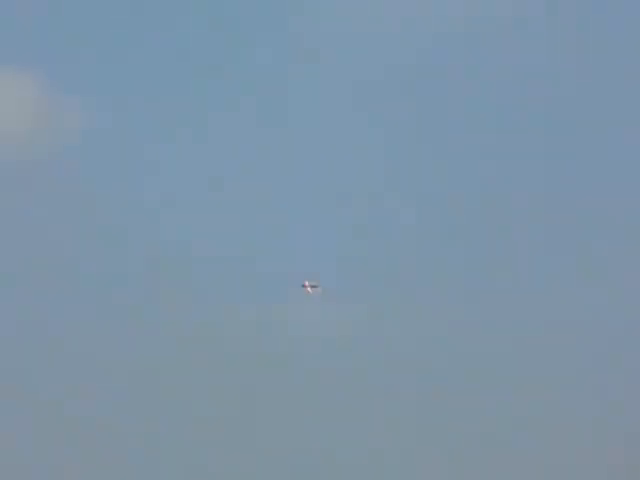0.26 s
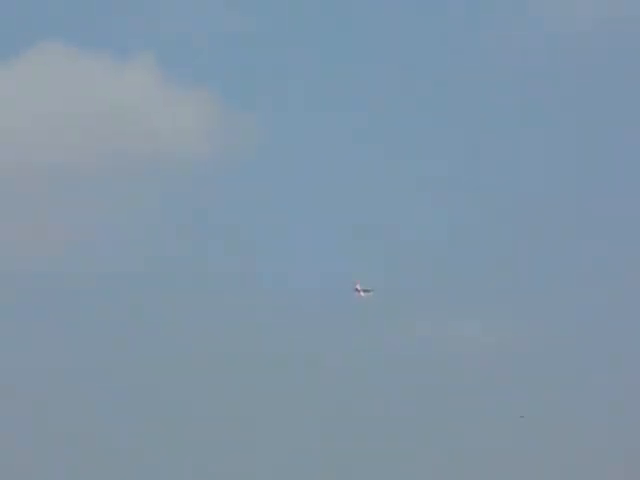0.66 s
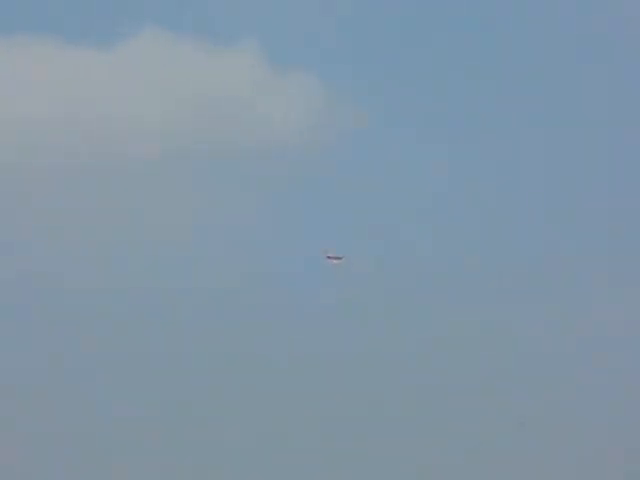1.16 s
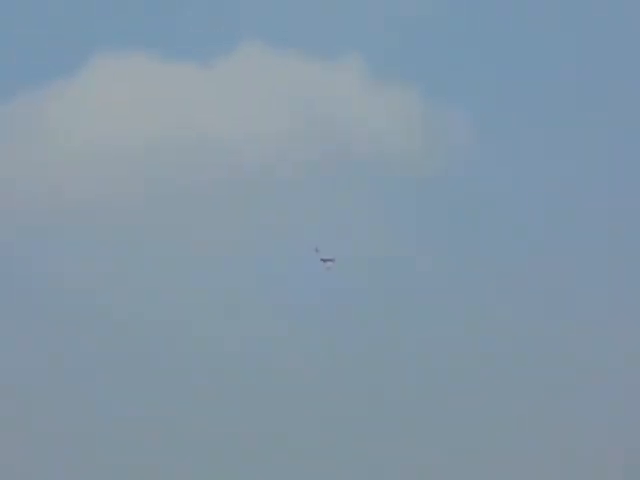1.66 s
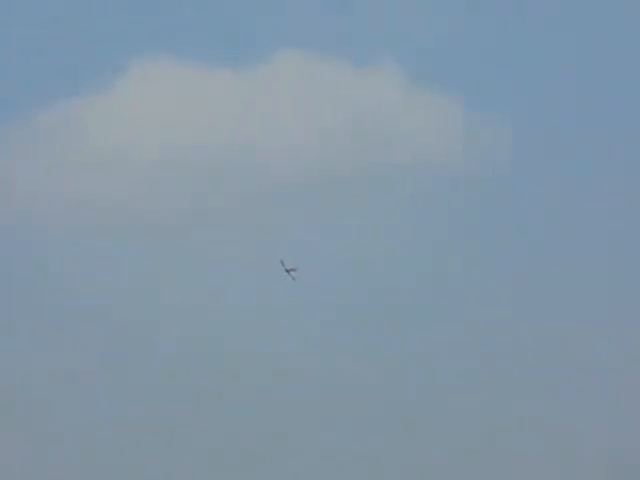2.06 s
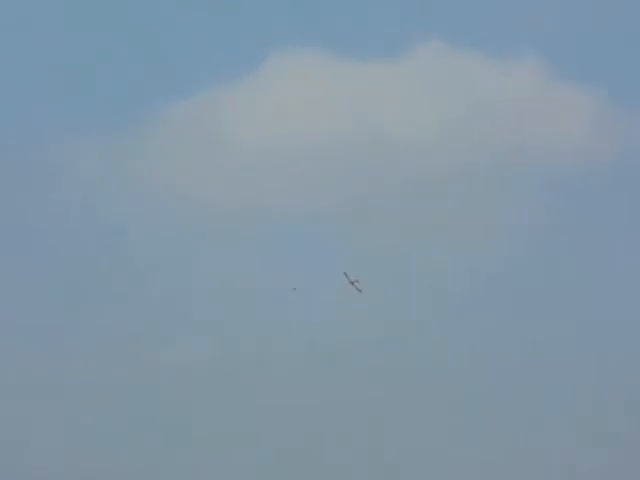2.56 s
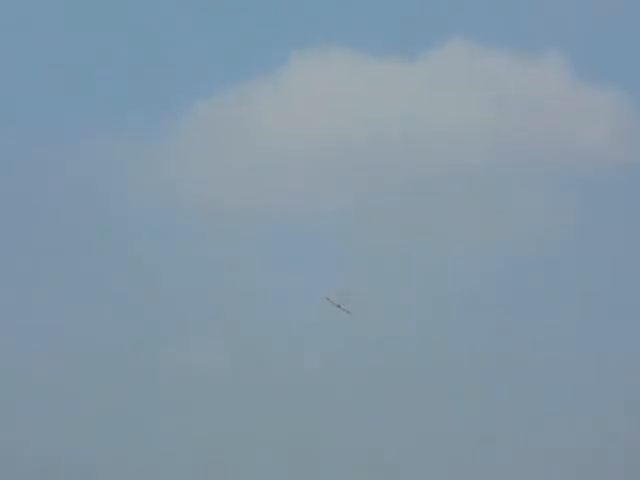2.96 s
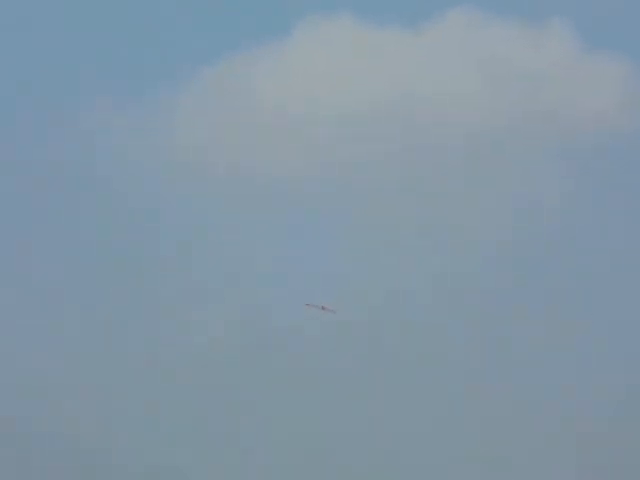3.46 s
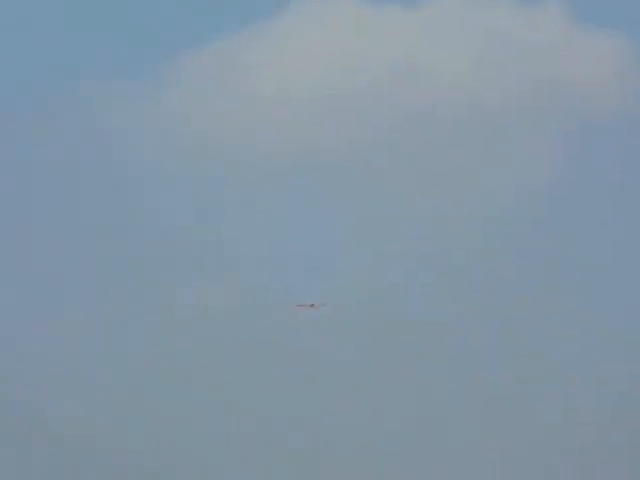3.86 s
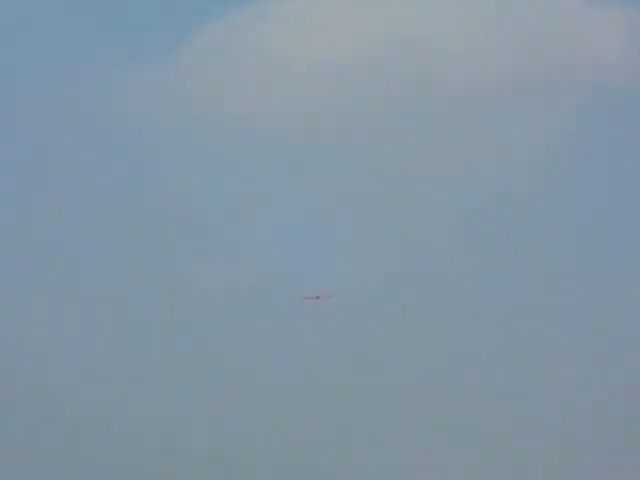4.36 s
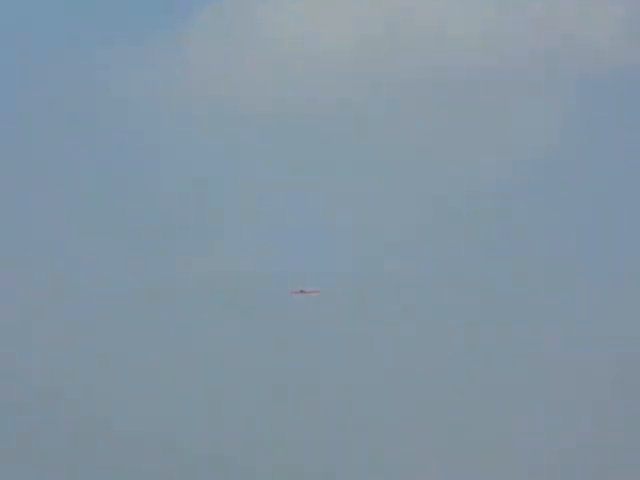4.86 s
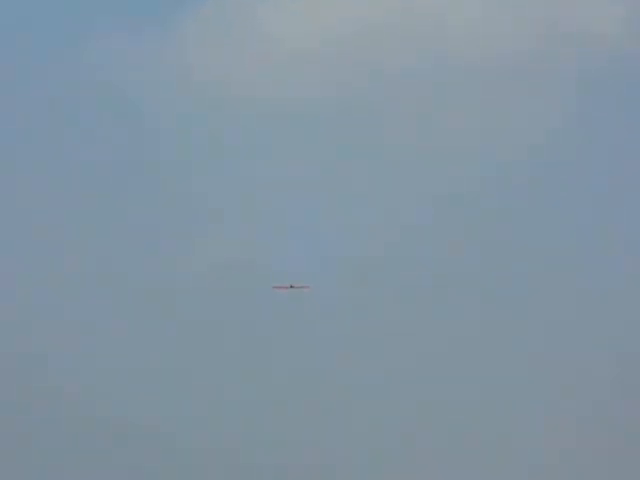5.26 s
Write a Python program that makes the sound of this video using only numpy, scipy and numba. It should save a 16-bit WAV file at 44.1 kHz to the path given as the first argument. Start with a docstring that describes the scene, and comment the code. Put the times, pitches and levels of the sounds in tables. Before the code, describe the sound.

In an open field, a small camera microphone picks up steady low wind rumble and a swelling hum. A tiny model airplane buzzes faintly far overhead, its nasal rasp coming and going. Small birds twitter throughout in quick falling chirps and fast trills, loudest around the middle. A hard plastic clack from the camera body comes at about half a second. The sound is coarse and lo-fi, with a glassy treble.

```python
"""An open field: a model airplane buzzes far overhead, its firing pulses and gas noise coloured by resonances.
Small birds twitter in falling chirps and quick trills, gliding sine notes with faint scattered echoes.
Filtered noise makes wind rumble on a small camera's microphone; a low hum swells and fades under it.
The camera's shell clacks once in ringing modes, and a limiter ducks the whole sound at loud peaks.
Coarse sampling gives the birds a glassy mirror image in the treble."""
import sys
import numpy as np
from scipy import signal
from scipy.fft import rfft, irfft, next_fast_len
from scipy.io import wavfile
from scipy.ndimage import uniform_filter1d
from numba import njit

SR = 44100
rng = np.random.default_rng(int(sys.argv[2]) if len(sys.argv) > 2 else 0)


def log_audio(samples):
    """Write samples as a 16-bit WAV file to the path given in sys.argv[1]."""
    # one column per channel
    frames = np.atleast_2d(samples).T
    # limit to full scale, then quantise
    limited = np.clip(frames, -1, 1)
    pcm = np.round(limited * 32767).astype(np.int16)
    wavfile.write(sys.argv[1], SR, pcm)


N = 242991
T = np.arange(N) / SR


def amp(db):
    """Decibels to gain."""
    return 10 ** (np.asarray(db) / 20)


def unit(x):
    """Scales to rms 1."""
    return x / np.sqrt(np.mean(x ** 2) + 1e-20)


def steadied(x):
    """Holds the rms near 1 over every tenth of a second, so that a level curve alone sets the slow swell."""
    return x / np.sqrt(abs(uniform_filter1d(x ** 2, size=4400)) + 1e-20)


def curves(rows):
    """Each column of a table, after its times, drawn as a curve over every sample."""
    s, *columns = np.transpose(rows)
    return [np.interp(T, s, c) for c in columns]


def add(mix, s, sound):
    """Mixes a sound in at time s."""
    part = mix[max(round(s * SR), 0):][:len(sound)]
    part += sound[:len(part)]


def noise(spectrum):
    """Noise of rms 1 with the given spectrum, dying away past its last point."""
    f, db = np.transpose(spectrum)
    size = next_fast_len(N)
    hz = np.fft.rfftfreq(size, 1 / SR) + 1  # the 1 keeps the logarithm finite
    gain = amp(np.interp(np.log(hz), np.log(f), db))
    gain = gain / (1 + (hz / f[-1] / 1.1) ** 20)
    white = rng.standard_normal(size)
    return unit(irfft(rfft(white) * gain, size)[:N])


def drift(rate):
    """Smooth random wandering of rms about 1, up to about rate times a second."""
    size, drift_rate = 4096, 500  # points, points per second
    hz = np.fft.rfftfreq(size, 1 / drift_rate)
    slow = irfft(rfft(rng.standard_normal(size)) / (1 + (hz / rate) ** 4))
    return unit(np.interp(T, np.arange(size) / drift_rate, slow))


@njit
def smooth(x, keep):
    """One-pole low-pass whose memory may change from sample to sample."""
    out, state = np.empty_like(x), 0j
    for i in range(len(x)):
        state = keep[i] * state + (1 - keep[i]) * x[i]
        out[i] = state
    return out


def ring(x, centre_hz, width_hz):
    """A resonance that can follow a moving centre and width: shift the centre to 0 Hz, smooth twice, shift back."""
    steady = np.ones(len(x))
    turn = np.exp(2j * np.pi * np.cumsum(centre_hz * steady) / SR)
    keep = np.exp(-np.pi * width_hz * steady / SR)
    return 2 * (turn * smooth(smooth(x / turn, keep), keep)).real


def engine(main_db=0.0, upper_db=-3, sizzle_db=-1, sizzle_low_db=-5, body_db=-53, twinkle_db=3.0, flutter_db=1.0):
    """Firing pulses and rasping puffs of gas pass the exhaust's resonances; moving air makes the harmonics twinkle."""
    # engine firing rate as heard on the ground, before jitter: [t/s, f/Hz]
    firing = [(.1, 113), (.3, 110), (.5, 104), (.8, 101.5), (1.0, 100.2), (1.35, 98.6), (1.62, 97.6),
              (2.12, 92.5), (2.35, 89.8), (3.08, 87.5), (3.42, 90), (3.74, 93.4), (4.02, 91.6),
              (4.17, 93.4), (4.4, 91), (4.65, 90.2), (5.11, 85.9), (5.3, 88)]
    # the exhaust turns towards and away from the ground; levels before trims:
    # [t/s, main resonance level/dB, its centre f/Hz, its width/Hz, upper resonance level/dB, sizzle level/dB]
    exhaust = [(.08, -67, 1530, 302, -72, -66), (.17, -49.5, 1560, 240, -61, -60.5),
               (.5, -51.5, 1580, 258, -56, -67), (.7, -58, 1710, 130, -62, -64),
               (.92, -54, 1700, 120, -63, -66), (1.3, -52, 1650, 172, -55.5, -58.5),
               (1.6, -52, 1630, 200, -59, -64), (1.78, -59, 1580, 403, -54, -61),
               (2.0, -54, 1750, 506, -48.5, -49.5), (2.25, -63, 1635, 500, -49.5, -55.5),
               (2.45, -64, 1650, 500, -53.5, -57), (2.9, -65, 1630, 504, -62.5, -70),
               (3.2, -53, 1590, 398, -54, -62), (3.5, -49.5, 1560, 450, -60, -54.5),
               (3.83, -52, 1560, 480, -64, -49), (4.07, -49, 1610, 490, -73, -60),
               (4.32, -47.5, 1710, 477, -66, -60), (4.7, -51, 1630, 377, -69, -62),
               (5.05, -51, 1690, 340, -65, -75), (5.4, -51, 1590, 300, -70, -74)]
    rasp_db = -9  # gas noise beside the pulses
    jitter = .0024  # unsteadiness of speed, as a share

    rate, = curves(firing)
    main, centre_hz, width_hz, upper, sizzle = curves(exhaust)
    phase = 2 * np.pi * np.cumsum(rate * (1 + jitter * drift(18.1))) / SR
    pulses = np.zeros(N)
    for order in range(5, 31):
        twinkle = amp(twinkle_db * drift(9))
        pulses += twinkle * np.cos(order * phase + .25 * drift(4))
    pulses = unit(pulses)
    hiss = noise([(500, 0.0032), (5000, 0.0054)])  # almost flat up to 5 kHz
    puffs = unit((1 + 0.71 * np.cos(phase)) * hiss)  # one puff per firing
    gas = pulses + amp(rasp_db) * puffs

    main_level = amp(main + main_db + flutter_db * drift(27))
    out = main_level * steadied(ring(gas, centre_hz, width_hz))
    out += amp(upper + upper_db) * steadied(ring(gas + puffs, 2440, width_hz=170))
    out += amp(sizzle + sizzle_low_db) * unit(ring(puffs, 2810, width_hz=390))
    out += amp(sizzle + sizzle_db) * unit(ring(puffs, 4200, width_hz=300))
    return out + amp(body_db) * unit(ring(pulses, 980, width_hz=570))


def whistle(hz, rough, late=1.32, quaver_db=0.5):
    """One bird note along a pitch curve, with slight flutter of pitch and level; a higher late delays its peak."""
    flutter = unit(uniform_filter1d(rng.standard_normal(4096), size=40))[:len(hz)]
    quaver = unit(uniform_filter1d(rng.standard_normal(4096), size=160))[:len(hz)]
    along = (np.arange(len(hz)) + .5) / len(hz)
    swell = np.sin(np.pi * along ** late) ** 0.95 * amp(quaver_db * quaver)
    phase = 2 * np.pi * np.cumsum(hz * (1 + rough * flutter)) / SR
    return np.sqrt(2) * swell * np.sin(phase)


def chirps(level_db=1, scatter_hz=20, scatter_db=1.06):
    """Near birds chirp in even runs that overlap; each note bends downwards, mostly ever faster."""
    # runs of chirps, pitches and levels before scatter, levels before trim:
    # [first note t/s, last note t/s, number of notes, note length/s, first top f/Hz, last top f/Hz,
    #  fall of each note/Hz, first level/dB, last level/dB, bend of the fall (1 = straight)]
    runs = [(.005, .195, 4, 0.049, 3820, 3850, 404, -62, -57.5, 1.7),
            (0.297, .445, 3, 0.045, 3830, 3800, 420, -63, -56, 1.7),
            (0.734, .805, 2, 0.038, 3850, 3870, 450, -52, -48, 1.5),
            (0.939, .94, 1, 0.043, 4060, 4090, 580, -52, -44, 1.7),
            (1.009, 1.348, 6, 0.047, 4140, 4130, 620, -47, -45, 2.3),
            (1.277, 1.492, 4, 0.051, 3920, 3880, 560, -49, -46.5, 1.44),
            (1.561, 1.642, 2, 0.04, 3890, 3960, 504, -49.5, -54, 1.6),
            (1.77, 1.765, 1, 0.0498, 3980, 3980, 620, -50, -50, 1.35),
            (2.231, 2.297, 3, .023, 3790, 3980, 480, -49, -47, 1.45),
            (2.32, 2.416, 4, 0.015, 4200, 4100, 420, -45, -48, 1.9),
            (2.322, 2.324, 1, 0.035, 3690, 3720, 480, -40, -38, 1.4),
            (2.364, 2.365, 1, 0.033, 3950, 3950, 600, -39, -38, 1.8),
            (2.433, 2.432, 1, 0.032, 4270, 4250, 836, -33, -34, .9),
            (2.392, 2.734, 6, 0.044, 3760, 3820, 514, -35.5, -33.5, 2.11),
            (2.48, 2.668, 4, 0.044, 4096, 4020, 684, -34, -42.5, 1.555),
            (2.795, 2.8, 1, 0.03, 3830, 3850, 310, -47, -44, 2.2),
            (2.844, 2.884, 2, 0.025, 3610, 3580, 308, -41, -38.5, 1.5),
            (3.003, 3.046, 2, 0.033, 3560, 3600, 318, -44, -39, 1.6),
            (3.176, 3.181, 1, 0.035, 3550, 3520, 230, -42.5, -42, 1.1),
            (4.343, 4.466, 3, .04, 4130, 4160, 750, -45.5, -38.5, 1.66),
            (4.52, 4.696, 4, 0.041, 4070, 3980, 606, -41.5, -43.5, 1.84),
            (4.798, 4.87, 3, 0.025, 3970, 3900, 380, -47.5, -44.5, 1.8),
            (4.891, 4.893, 1, 0.029, 4100, 4080, 420, -46, -47, 1.5),
            (4.949, 5.222, 5, 0.05, 4070, 4110, 650, -44, -44, 1.8),
            (4.732, 5.205, 6, 0.035, 3740, 3780, 380, -56, -57, 1.7),
            (5.27, 5.415, 3, 0.033, 3830, 3840, 497, -48, -47, 1.6),
            (5.478, 5.478, 1, 0.034, 3960, 3960, 555, -46.5, -46, 1.94)]
    arch_db = 1.5  # extra level in the middle of a run

    out = np.zeros(N)
    for first_s, last_s, notes, length, first_hz, last_hz, fall_hz, first_db, last_db, bend in runs:
        u = np.linspace(0, 1, min(round(length * SR), 4096))
        for along in np.linspace(0, 1, round(notes)):
            top_hz = rng.normal(first_hz + (last_hz - first_hz) * along, scatter_hz)
            db = rng.normal(first_db + (last_db - first_db) * along, scatter_db)
            db += arch_db * np.sin(np.pi * along)
            note = whistle(top_hz - fall_hz * u ** bend, rough=0.003)
            add(out, first_s + (last_s - first_s) * along, amp(db + level_db) * note)
    return out


def trills(level_db=1, tick_gap=.015, tick_length=.012, stray_s=.0008, scatter_db=0.2):
    """Each trill is a quick, slightly uneven group of very short, falling ticks."""
    # bouts of evenly repeated trills, pitch and levels before scatter, levels before trim:
    # [first trill t/s, last trill t/s, number of trills, ticks in each, middle f/Hz, fall of each tick/Hz,
    #  first level/dB, last level/dB]
    bouts = [(.1, .38, 3, 3, 5100, 250, -62, -59), (.795, .926, 2, 3, 4880, 250, -52, -49.5),
             (1.052, 1.318, 3, 4, 4930, 350, -49, -48), (.886, .886, 1, 2, 5020, 1100, -49, -48),
             (1.002, 1.442, 4, 4, 5000, 1250, -49.5, -45), (2.338, 2.338, 1, 3, 4960, 1200, -44.5, -43),
             (2.466, 2.905, 4, 4, 4950, 1200, -45, -43), (2.478, 3.024, 5, 4, 4950, 480, -56, -49.5),
             (3.97, 3.97, 1, 2, 5020, 1200, -45.5, -45), (4.084, 4.378, 3, 4, 4970, 1200, -44.5, -44),
             (4.16, 4.69, 5, 4, 4890, 250, -50.5, -51), (5.25, 5.25, 1, 2, 5030, 1150, -47, -46),
             (5.362, 5.362, 1, 4, 4970, 1150, -46.5, -46.5)]

    out = np.zeros(N)
    for first_s, last_s, groups, ticks, tick_hz, fall_hz, first_db, last_db in bouts:
        sweep = tick_hz + fall_hz * np.linspace(.5, -.5, round(tick_length * SR))
        for s, db in np.linspace((first_s, first_db), (last_s, last_db), round(groups)):
            for k in range(round(ticks)):
                tick = whistle(sweep * rng.normal(1, 0.008), rough=0.012, late=0.97)
                start_s = s + k * tick_gap + rng.normal(0, stray_s)
                add(out, start_s, amp(db + level_db + rng.normal(0, scatter_db)) * tick)
    return out


def click(level_db=-8.5, rattle_db=-18.0, rattle_t60=0.12, fizz_db=-10, scatter_db=1, lowest_hz=700):
    """Scrapes, two snaps and small rebounds ring the camera's plastic shell; loose parts chatter after each hit."""
    # hits on the shell: [t/s, relative level/dB, brightness as a gain on the modes above 2 kHz]
    hits = [(.5085, -25, .3), (0.5143, 0, 0.4), (0.5289, -4.5, 1.2), (0.5321, -13, .5), (.5395, -24, .5),
            (0.5435, -18, .8), (.5497, -22, .4), (.585, -30, 1), (0.5927, -26, .8)]
    # plastic sliding around the snaps: [start t/s, length/s, level/dB]
    scrapes = [(0.507, 0.0078, -33.5), (0.521, 0.0092, -29), (0.543, 0.0092, -36)]
    # modes of the shell: [f/Hz, relative level/dB before scatter, t60/s]
    shell = [(863, -27, 0.14), (950, -19, 0.012), (1010, -33, 0.081), (1057, -22, 0.074), (1080, -19, .07),
             (1145, -13, .06), (1260, 0.5, 0.024), (1312, -11.5, 0.05), (1460, -20, 0.0074),
             (1620, -21, 0.048), (1860, -14, 0.015), (2210, -2.5, 0.017), (2920, -34, 0.024),
             (4340, -15.5, 0.036)]
    contacts_per_s = 3700  # chatter of the loose parts

    out, t = np.zeros(N), np.arange(SR // 5) / SR
    for s, db, bright in hits:
        modes = np.zeros(len(t))
        for hz, mode_db, t60 in shell:
            decay = amp(rng.normal(mode_db, scatter_db) - 60 * t / t60)
            modes += decay * (bright if hz > 2000 else 1) * np.sin(2 * np.pi * hz * t)
        add(out, s, -amp(level_db + db) * modes)
        chatter = rng.standard_normal(len(t)) * (rng.random(len(t)) < contacts_per_s / SR)
        rattle = unit(ring(chatter, 1170, width_hz=470))
        rattle += amp(fizz_db) * unit(ring(chatter, 2500, width_hz=7200))
        add(out, s, amp(rattle_db + db - 60 * t / rattle_t60) * rattle)
    for s, length, db in scrapes:
        stroke = np.sin(np.pi * np.minimum(t / length, 1))
        rub = unit(ring(rng.standard_normal(len(t)), 4500, width_hz=310))
        add(out, s, amp(db) * stroke * rub)
    highpass = signal.butter(3, lowest_hz, "high", fs=SR, output="sos")
    return signal.sosfilt(highpass, out)  # so small a shell gives no bass


def wind(rumble_db=1.05, flutter_db=-1.96, rush_db=0.0, hiss_db=-9, deep_db=-1.5, rumble_lumps_db=1, flutter_lumps_db=1):
    """Eddies rumble at the microphone and flutter round the housing, over a rush of air, a deep undertow and hiss."""
    # strength of the wind, before trims:
    # [t/s, rumble level/dB, flutter over the housing level/dB, rush of air level/dB, deep undertow level/dB]
    gusts = [(0, -44.5, -54, -53, -39), (.22, -37, -41.5, -45.5, -45.5), (.48, -30, -41, -42.5, -43),
             (.72, -30.5, -34, -43.5, -42), (1.05, -30.5, -34, -43.5, -41.5), (1.5, -29, -34.5, -40.5, -43),
             (2.15, -32.5, -35, -42, -37.5), (2.6, -32, -45.5, -42.5, -36.5),
             (3.35, -33.5, -45.5, -42, -38), (3.8, -29, -42.5, -41.5, -38), (4.1, -31, -41, -41.5, -36.5),
             (4.38, -29.5, -36, -41, -39), (4.7, -32, -40.5, -42.5, -43), (5.2, -34.5, -39, -41.5, -39),
             (5.51, -37, -40.5, -41.5, -34)]
    # spectra of eddies at the microphone, flutter, rush, hiss and undertow: each [f/Hz, relative level/dB per Hz]
    rumble_spectrum = [(50, -30), (85, -13.5), (105, -11), (135, -1), (152, -4.5), (168, -2), (184, -1),
                       (215, -3.5), (260, -12), (320, -24), (600, -50.5)]
    flutter_spectrum = [(250, -28), (320, -6), (365, 2), (420, 2), (490, -1.5), (560, -23.5), (640, -10),
                        (800, -45)]
    rush_spectrum = [(200, -1.5), (600, 3), (800, -2), (1100, -3.5), (1400, -6), (2000, -10.5), (3000, -24),
                     (5400, -38.5)]
    hiss_spectrum = [(1000, -13.5), (2500, -2), (3200, 1.5), (3700, 3.5), (4300, -0.5), (4650, -0.5),
                     (5500, -2)]
    deep_spectrum = [(15, -21.5), (40, 0), (62, 1), (80, -1), (130, -4)]

    rumble, flutter, rush, deep = curves(gusts)
    rumble_level = amp(rumble + rumble_db + rumble_lumps_db * drift(4))
    out = rumble_level * steadied(noise(rumble_spectrum))
    flutter_level = amp(flutter + flutter_db + flutter_lumps_db * drift(25))
    out += flutter_level * steadied(noise(flutter_spectrum))
    out += amp(rush + rush_db + 0.26 * drift(54)) * noise(rush_spectrum)
    out += amp(deep + deep_db) * steadied(noise(deep_spectrum))
    return out + amp(rush + hiss_db + drift(2.8)) * noise(hiss_spectrum)  # hiss follows the rush


def hum(level_db=-0.76, octave_db=-2.5, waver=0.0095, rest_throb_db=1.2, octave_throb_db=1.0, onset_s=0.32):
    """A low tone that fades in, wavers and swells; its octave drones on with swells of its own."""
    # swells over the resting level, before trim: [start t/s, length/s, level/dB]
    swells = [(0.34, 0.29, -33), (0.54, 0.38, -35), (1.026, 0.44, -35.5), (1.477, 1, -32),
              (2.883, 0.99, -30), (4.147, 0.5, -26), (4.54, 0.55, -29)]
    # level of the octave, before trim and throb: [t/s, level/dB]
    octave_levels = [(0, -53), (.25, -32), (.5, -32.5), (.7, -33), (1.1, -28.5), (1.45, -36), (1.75, -37.5),
                     (2.0, -35), (2.4, -39), (2.75, -31), (3.12, -33), (3.35, -38.5), (3.78, -29.5),
                     (4.15, -33), (4.6, -38), (5.51, -36.5)]
    hum_hz, sharp_hz = 82.33, 3  # the upper tone sits a little above the true octave
    rise_s, fall_s, rest_db = 0.24, 0.24, -41  # resting level before throb and trim

    level = amp(rest_db + rest_throb_db * drift(2.9)) * np.minimum(T / onset_s, 1)
    for s, length, db in swells:
        swell = np.clip(np.minimum((T - s) / rise_s, (s + length - T) / fall_s), 0, 1)
        level = level + amp(db) * swell
    phase = 2 * np.pi * np.cumsum(hum_hz * (1 + waver * drift(7.9))) / SR
    octave_level = amp(curves(octave_levels)[0] + octave_db + octave_throb_db * drift(6.2))
    octave_phase = 2 * phase + 2 * np.pi * sharp_hz * T + 1.05 * drift(6.2)
    octave = octave_level * np.sin(octave_phase)
    return np.sqrt(2) * (amp(level_db) * level * np.sin(phase) + octave)


def flock(chirp_gap=0.072, count=3):
    """Farther birds keep up loose series of similar falling chirps, each bird fainter than the one before."""
    # shared level of the distant twitter: [t/s, level/dB]
    twitter = [(0, -65), (.3, -61), (.6, -58), (1.2, -56), (1.38, -52), (1.75, -55), (2.0, -57), (2.3, -51),
               (2.6, -48), (3.1, -64), (4.1, -60.5), (4.7, -51), (5.1, -57), (5.51, -52)]

    level, = curves(twitter)
    notes, u = np.zeros(N), np.linspace(0, 1, round(0.033 * SR))
    for bird in range(count):
        gap, pitch, size = rng.uniform(-1, 1, (120, 3)).T
        starts = np.cumsum(chirp_gap * (1 + .15 * gap)) - chirp_gap
        for s, p, db in zip(starts, pitch, 2 * size - 2 * bird):
            note = whistle(3880 + 70 * p - 430 * u ** 1.4, rough=0.012)
            add(notes, s, amp(db) * note)
    return amp(level) * notes


def field(x, echo_db=-12, t60=0.13):
    """Faint scattered echoes from the ground and its plants."""
    t = np.arange(SR // 2) / SR
    hit = (rng.random(len(t)) < 2000 / SR) * (t > .008)  # 2000 echoes a second, none before 8 ms
    taps = rng.standard_normal(len(t)) * hit
    echoes = unit(taps * amp(-60 * t / t60)) / np.sqrt(len(t))  # total energy 1
    return x + amp(echo_db) * signal.fftconvolve(x, echoes)[:N]


def scene():
    """Everything that reaches the one microphone."""
    birds = field(chirps() + trills() + flock())
    return (engine() + birds + click() + wind() + hum())[None]


def record(dry, limit_db=-14.5, recovery_db=24, top_db=-9):
    """A limiter that lets go slowly, coarse samples joined by straight lines, then a dull top and the band limit."""
    camera_hz, edge_hz = 11025, 9900  # coarse sampling rate, upper band limit
    x = dry[0]
    fall = recovery_db * T  # dB regained each second
    over_db = np.maximum(20 * np.log10(abs(x) + 1e-9) - limit_db, 0)
    x = x / amp(np.maximum.accumulate(over_db + fall) - fall)  # ducks at once
    step = round(SR / camera_hz)
    x = np.interp(T, T[::step], x[::step])  # mirrors the treble about half the camera's rate
    x *= signal.windows.tukey(N, .001)  # very short fades at both ends
    hz = [0, 7600, 8300, edge_hz, edge_hz + 100, SR / 2]
    gains = [1, 1, amp(top_db), amp(top_db), 0, 0]
    lowpass = signal.firwin2(401, hz, gains, window=("kaiser", 9), fs=SR)
    return signal.oaconvolve(x, lowpass, "same")[None]


dry = scene()
out = record(dry)
log_audio(out)
```